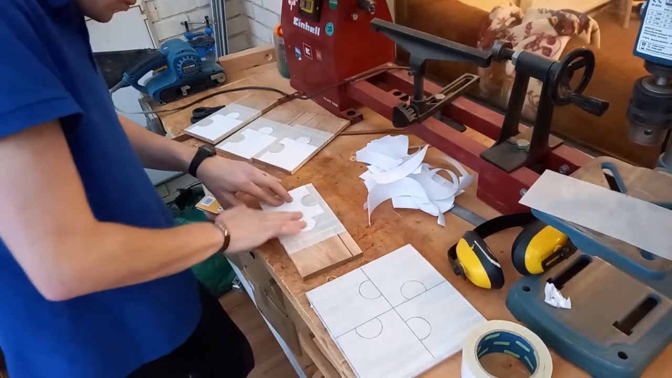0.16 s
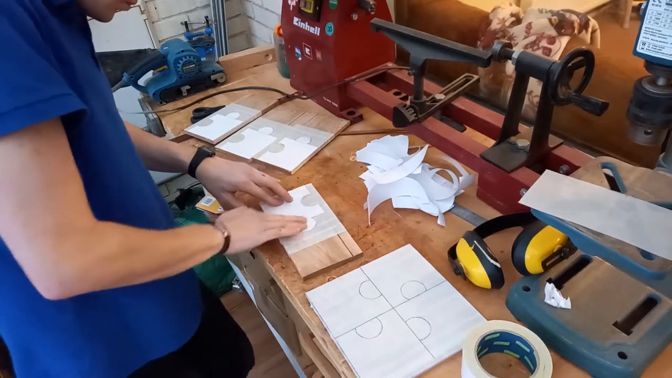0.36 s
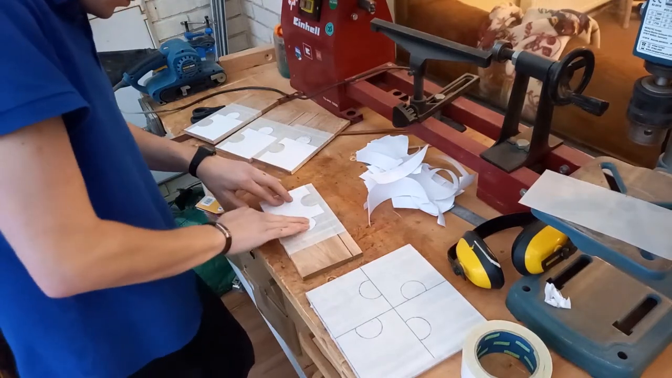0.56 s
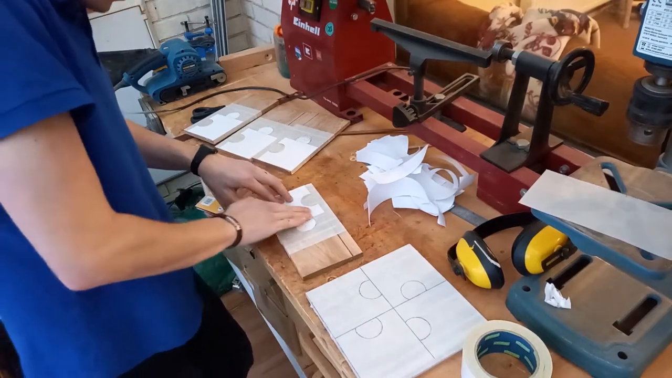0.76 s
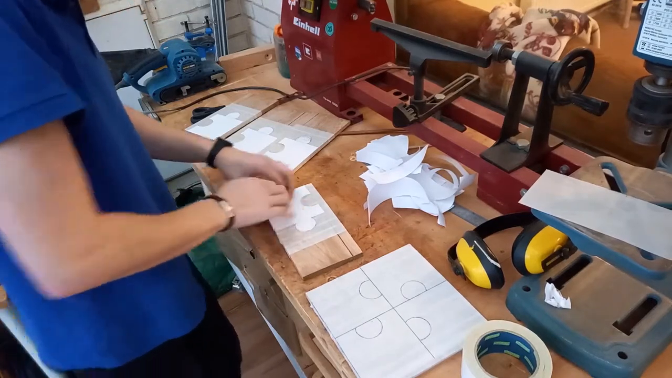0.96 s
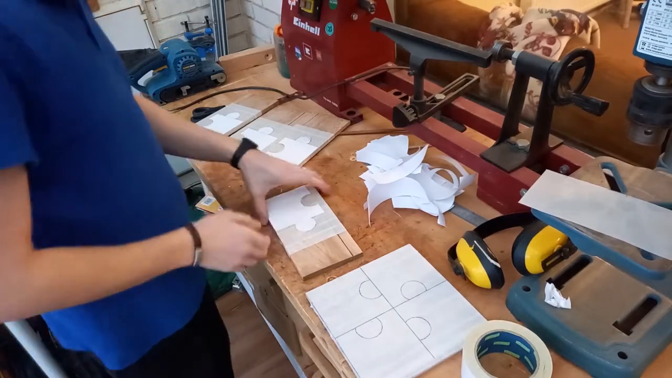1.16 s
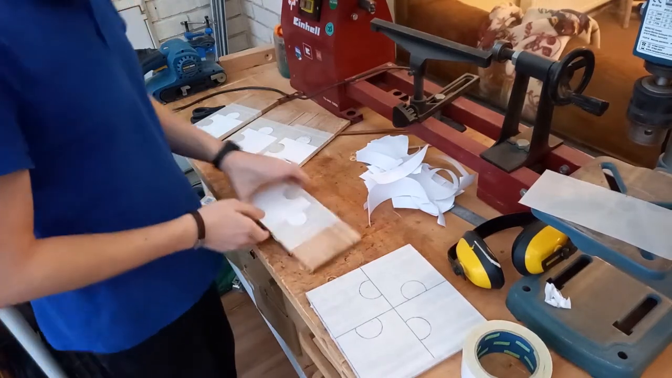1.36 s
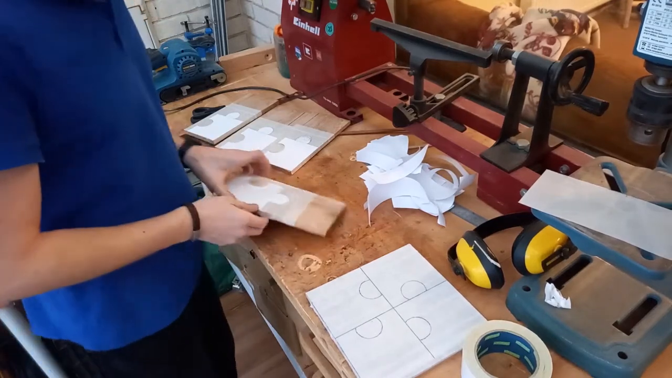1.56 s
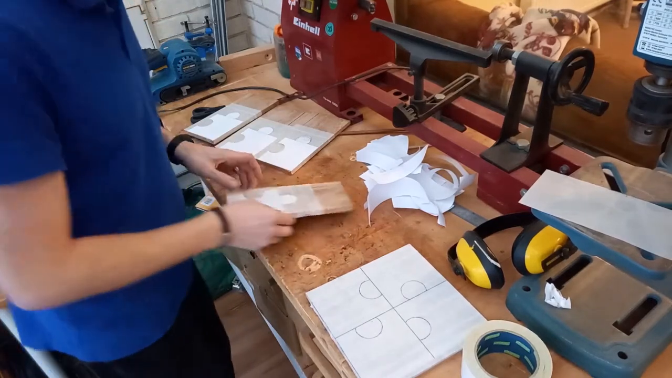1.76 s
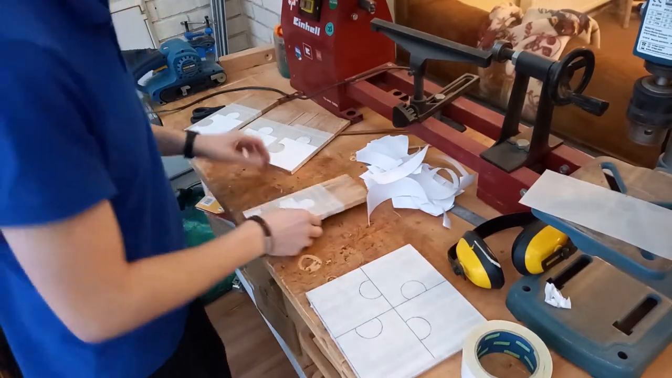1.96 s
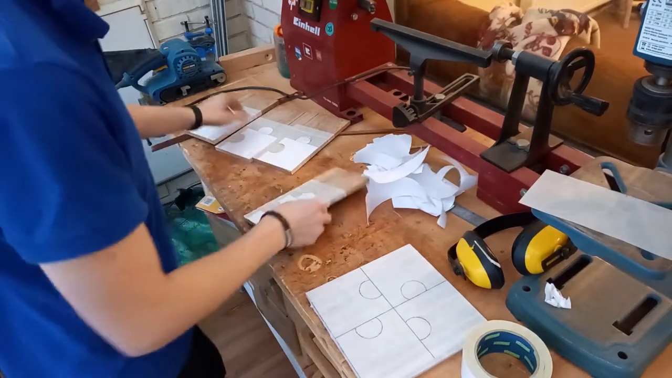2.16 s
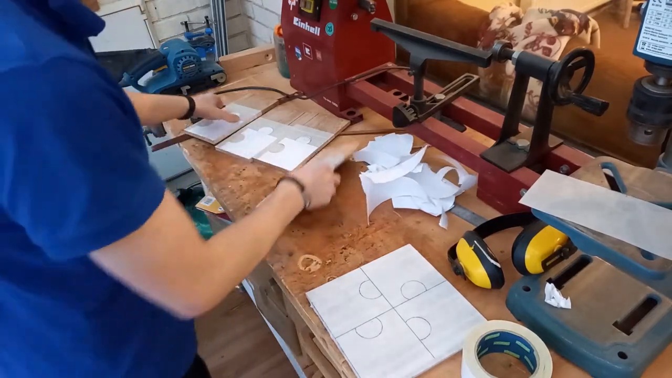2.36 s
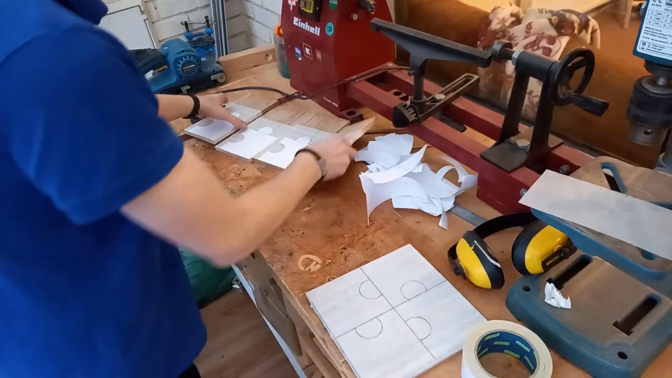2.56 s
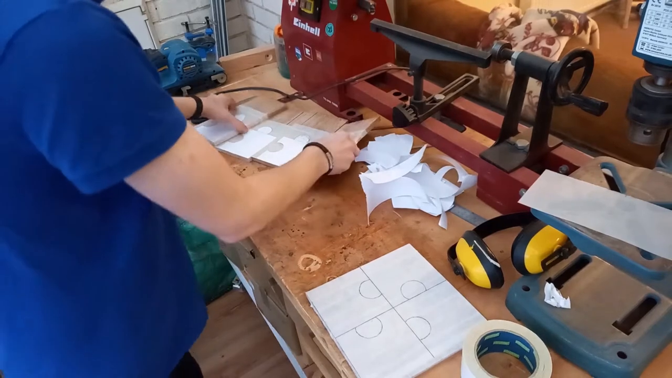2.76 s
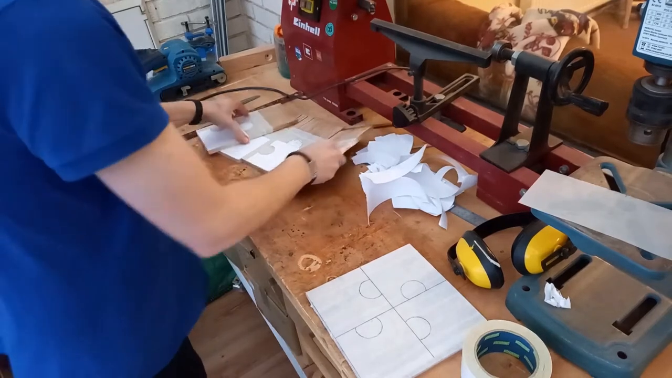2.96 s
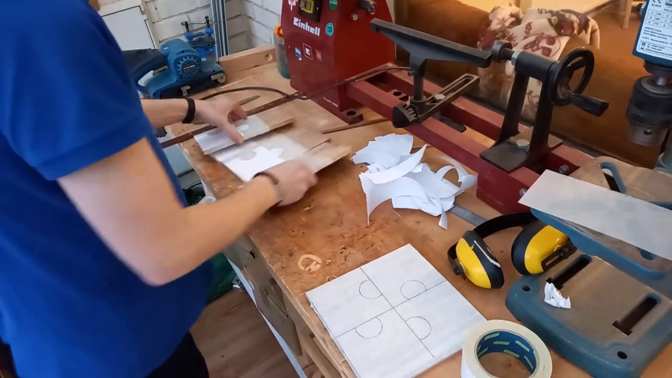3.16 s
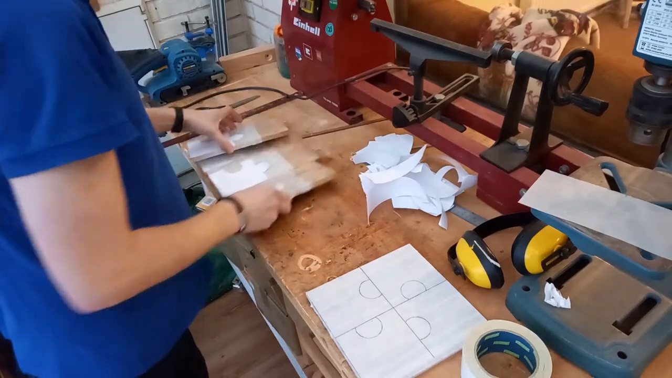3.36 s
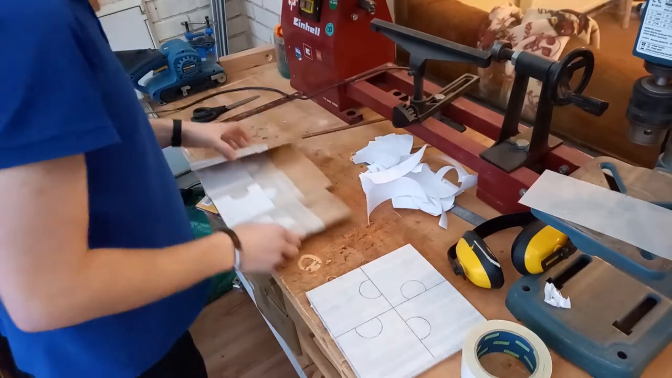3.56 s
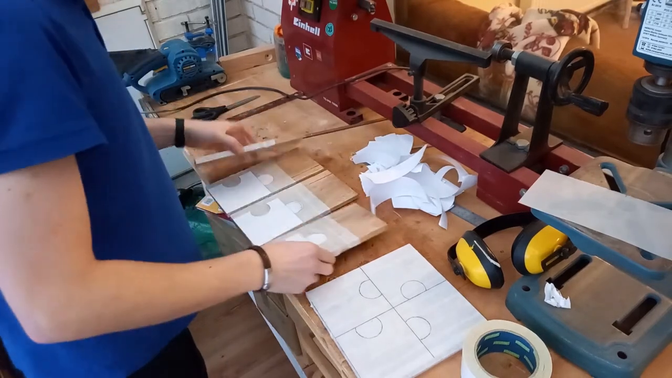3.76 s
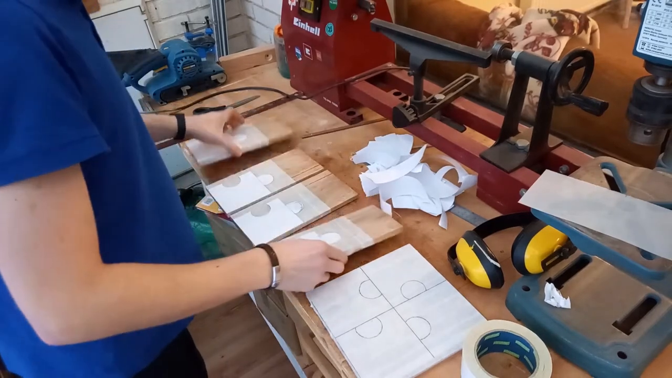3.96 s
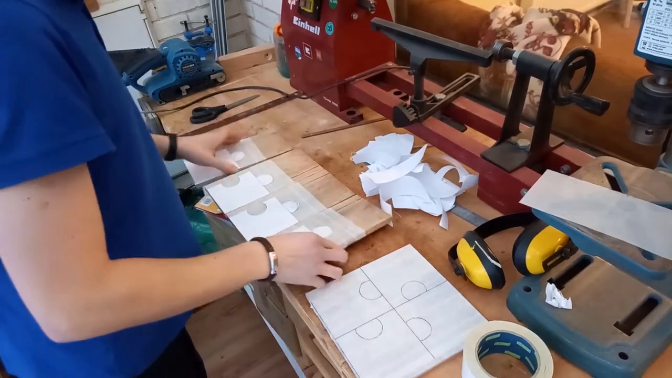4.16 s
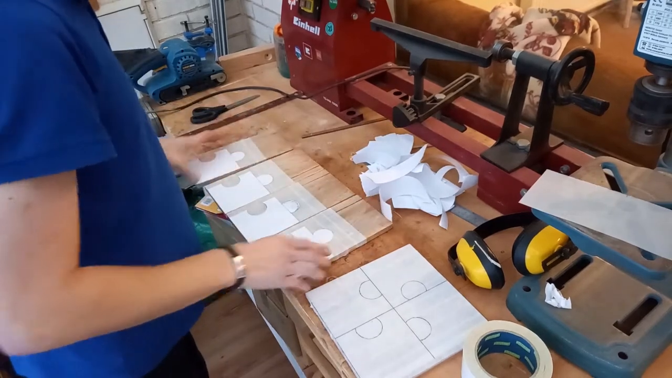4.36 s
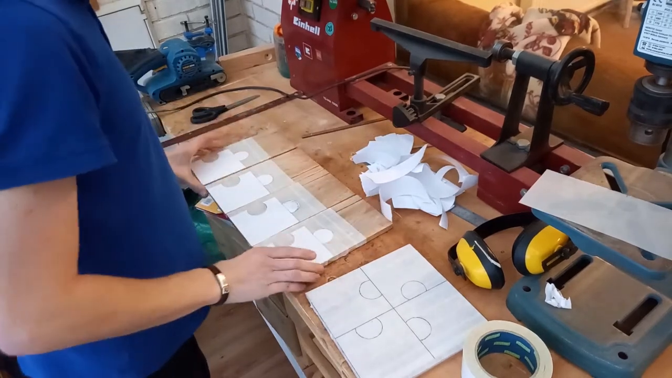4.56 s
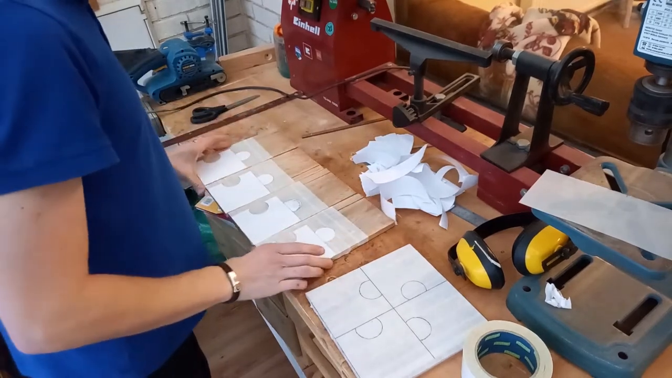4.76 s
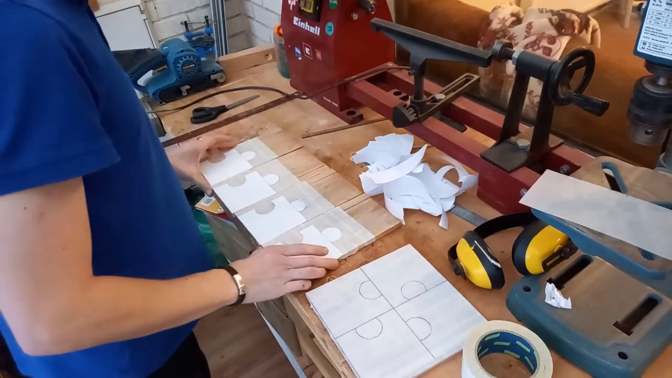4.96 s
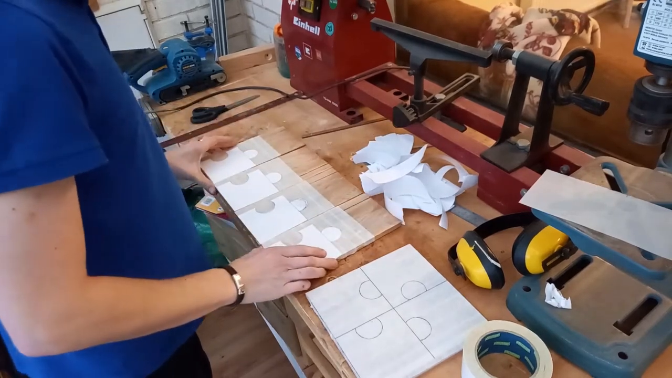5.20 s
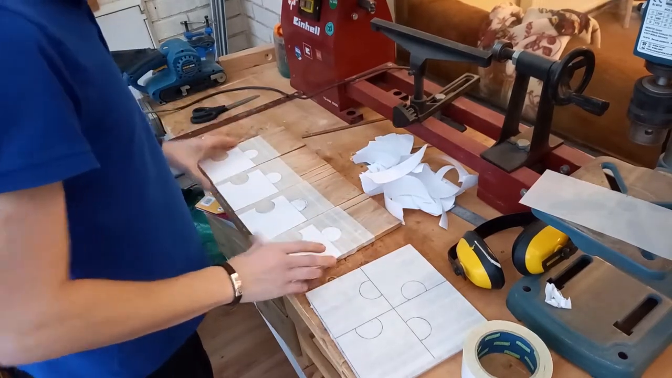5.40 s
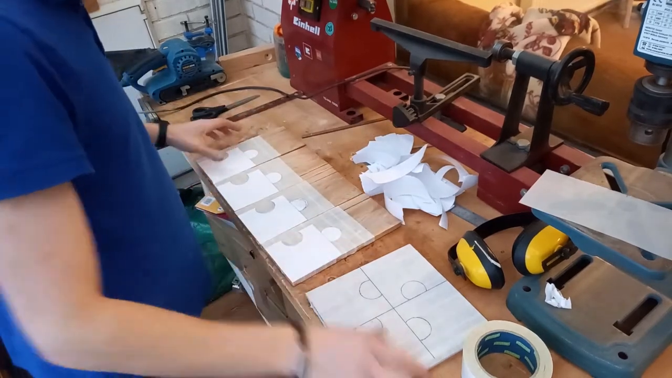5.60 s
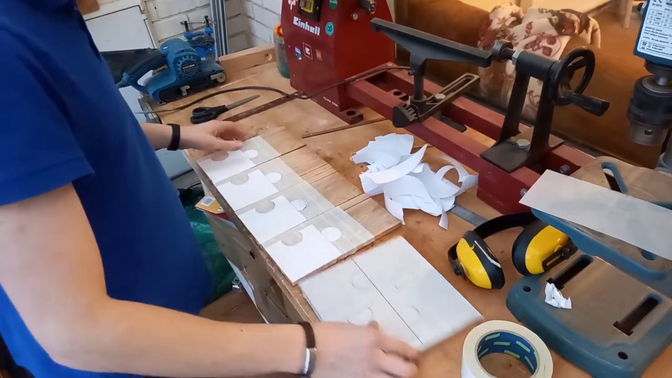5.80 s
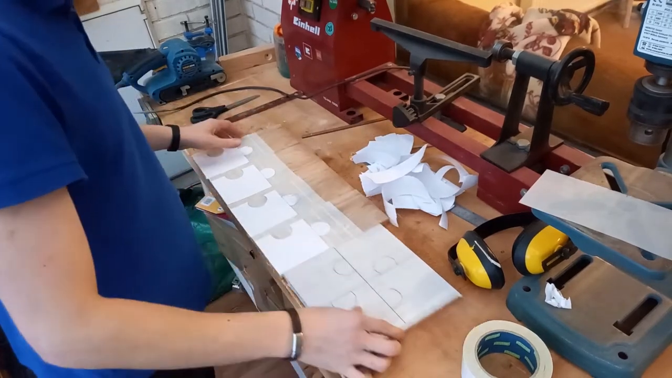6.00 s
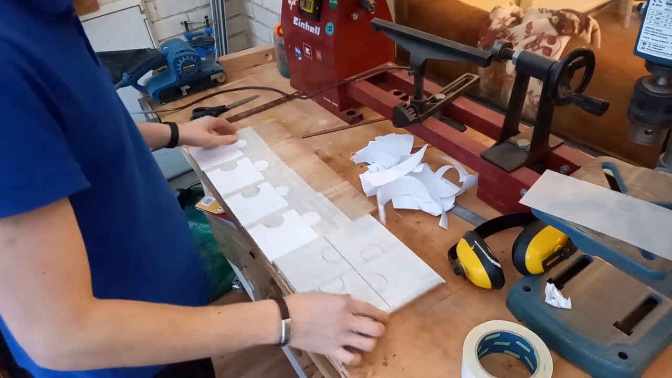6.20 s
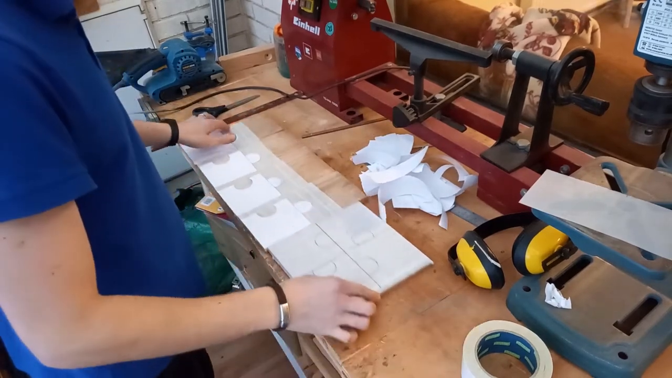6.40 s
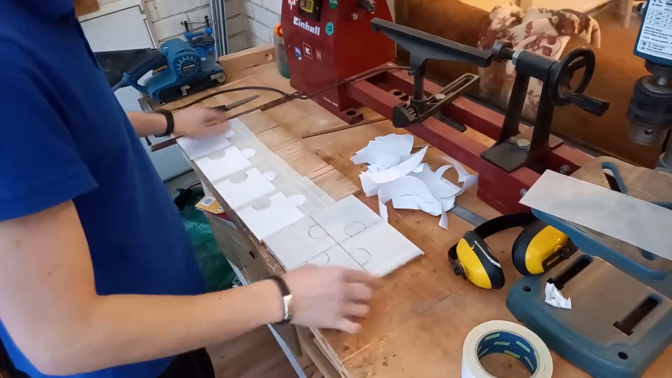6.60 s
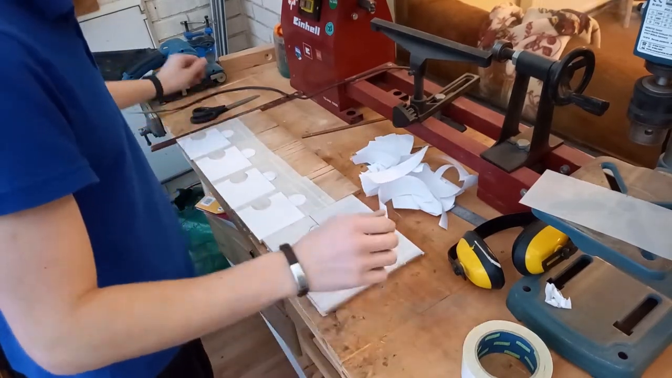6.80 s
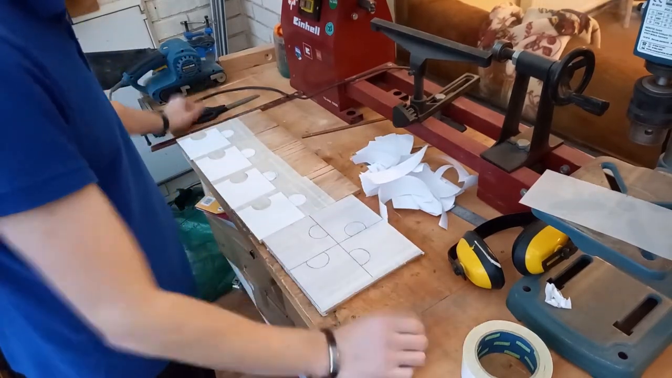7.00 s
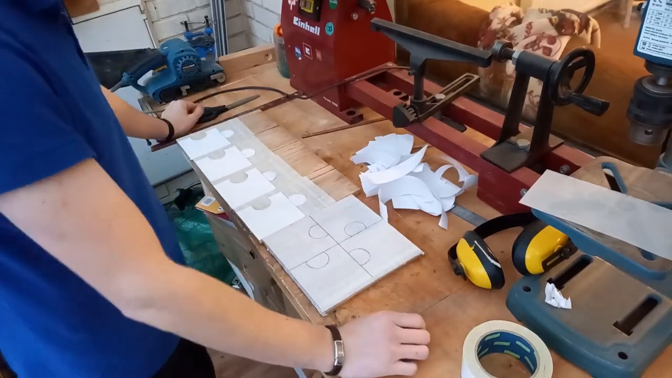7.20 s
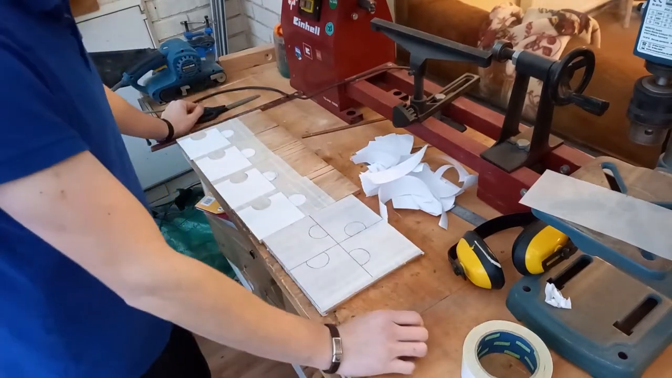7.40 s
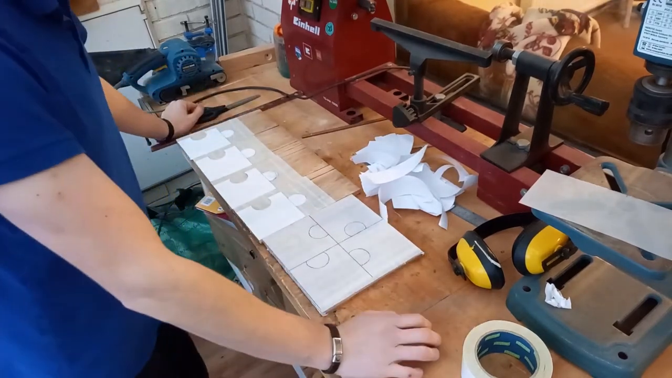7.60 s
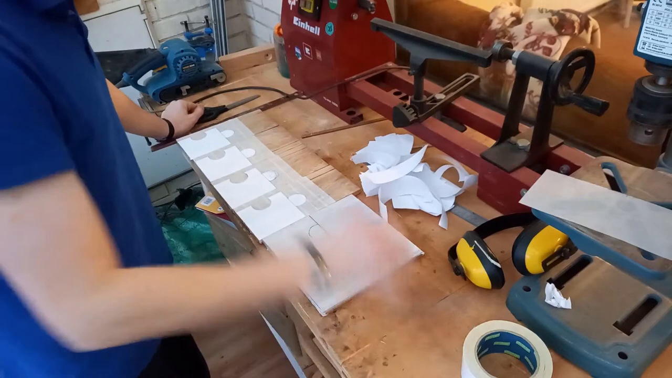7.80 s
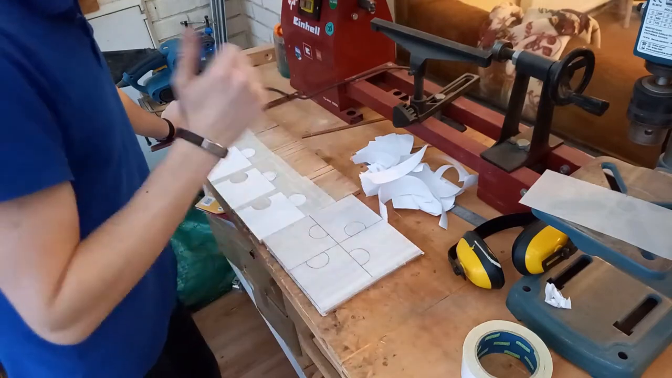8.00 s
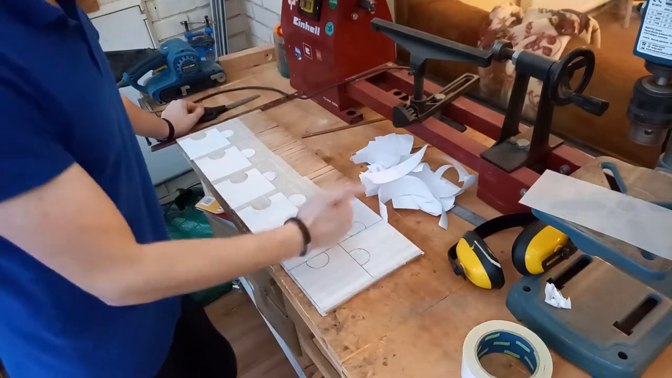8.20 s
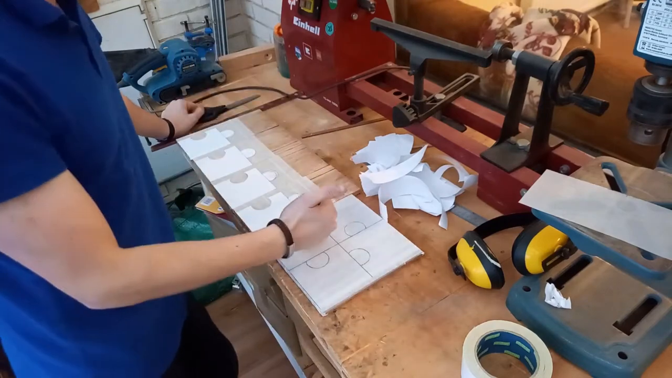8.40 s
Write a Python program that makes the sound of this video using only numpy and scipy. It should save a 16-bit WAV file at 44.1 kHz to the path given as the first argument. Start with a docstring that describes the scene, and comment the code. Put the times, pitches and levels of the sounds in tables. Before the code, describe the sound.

Fingers smooth paper on wood, then thin boards slide, knock and clack down on a workbench in a quiet room.

```python
"""A small workshop, a stereo pair of microphones close to a wooden workbench, faint air behind.
Thin wooden blanks with paper templates stuck on are being handled: fingers smooth the paper, one blank
is scraped off the bench, a stack is dragged closer and clacks down, the row is pushed along, and a hand
drops on the bench. Knocks and the friction of grain on grain ring bench, blank and paper together,
and the room answers with short reflections."""
import sys
import numpy as np
from scipy import signal
from scipy.fft import rfft, irfft, next_fast_len
from scipy.io import wavfile
from scipy.ndimage import uniform_filter1d

SR = 44100
rng = np.random.default_rng(int(sys.argv[2]) if len(sys.argv) > 2 else 0)


def file_out(sig):
    """Save sig as 16-bit WAV at sys.argv[1]."""
    # one column per channel
    cols = np.atleast_2d(sig).T
    # limit, then scale
    lim = np.clip(cols, -1, 1)
    pcm = np.round(lim * 32767).astype(np.int16)
    wavfile.write(sys.argv[1], SR, pcm)


N = 372644
RING_T = np.arange(SR // 3) / SR  # time axis of one ring-out, s


def gain_of(db):
    """Decibels to a factor."""
    return 10 ** (np.asarray(db) / 20)


def unit_rms(x):
    """Scales to rms 1."""
    return x / np.sqrt(np.mean(x ** 2) + 1e-30)


def unit_energy(x):
    """Scales to energy 1."""
    return x / (np.linalg.norm(x) + 1e-30)


def at_level(sound, db):
    """Sets the rms level of the first 25 ms."""
    return gain_of(db) * sound / np.sqrt(np.mean(sound[:SR // 40] ** 2) + 1e-30)


def read(points, hz):
    """Reads a table along a log-frequency axis."""
    f, value = np.transpose(points)
    return np.interp(np.log(hz + 1), np.log(f + 1), value)


def add(mix, s, sound):
    """Lays a sound into the mix at time s."""
    part = mix[max(round(s * SR), 0):][:len(sound)]
    part += sound[:len(part)]


def tinted(x, spectrum):
    """Colours a sound by a table of f/Hz, level/dB."""
    size = next_fast_len(x.shape[-1])
    gain = gain_of(read(spectrum, np.fft.rfftfreq(size, 1 / SR)))
    return irfft(rfft(x, size) * gain, size)[..., :x.shape[-1]]


def cut(x, hz, kind, order=3):
    """Low-, high- or band-pass."""
    return signal.sosfilt(signal.butter(order, np.clip(hz, 20, .49 * SR), kind, fs=SR, output="sos"), x)


def ringing(modes):
    """Response of separate modes to a click."""
    return unit_energy(sum((-1) ** k * gain_of(db - 60 * RING_T / t60) * np.sin(2 * np.pi * hz * RING_T)
                           for k, (hz, db, t60) in enumerate(modes)))


def damped(spectrum):
    """Response of crowded, quickly damped resonances to a click: a short coloured push."""
    log_gain = np.log(gain_of(read(spectrum, abs(np.fft.fftfreq(2 * len(RING_T), 1 / SR)))))
    minimum_phase = np.exp(np.conj(signal.hilbert(log_gain)))
    return unit_energy(np.fft.ifft(minimum_phase).real[:len(RING_T)])


def grains(count, per_s, spread_db):
    """Tiny collisions of surface roughness, of random size and sign."""
    size = gain_of(spread_db * np.minimum(rng.exponential(1, count), 5))
    return unit_rms(size * rng.standard_normal(count) * (rng.random(count) < per_s / SR))


# diffuse sound at the left and right microphones: f/Hz, correlation
MIC_LIKENESS = [(70, 1), (200, 0.81), (380, 0.86), (700, 0.65), (1300, -0.36), (4000, 0.28), (14000, 0.98)]
def diffuse_noise(count):
    """Stereo noise, as alike as the two microphones hear a diffuse field."""
    size = next_fast_len(count)
    a, b = rfft(rng.standard_normal((2, count)), size)
    same = np.clip(read(MIC_LIKENESS, np.fft.rfftfreq(size, 1 / SR)), -1, 1)
    mid, side = a * np.sqrt((1 + same) / 2), b * np.sqrt((1 - same) / 2)
    return irfft(np.array([mid + side, mid - side]), size)[:, :count]


# still air all round the microphones: f/Hz, relative level/dB
AIR_SPECTRUM = [(18, -45), (30, -13.5), (48, -11.5), (69, -5), (97, -13.5), (152, -12.5), (292, -14.5),
                (830, -17), (1140, -18.5), (2360, -22), (3320, -12.5), (4400, -23), (15500, -34.5)]
# its slow drift: t/s, level/dB
AIR_LEVEL = [(0, -68.5), (1.1, -69), (4.4, -77), (5.3, -80), (6.9, -72.5), (8.0, -71)]
def air():
    """Room tone: the faint hiss and hum of the workshop."""
    level_db = np.interp(np.arange(N) / SR, *np.transpose(AIR_LEVEL))
    return unit_rms(tinted(diffuse_noise(N), AIR_SPECTRUM)) * gain_of(level_db)


# modes of the bench top and of a blank held in the air: f/Hz, relative level/dB, t60/s
BENCH_MODES = [(168.27, 2, 0.14), (201.4, -4, .11), (227.6, 1.5, 0.13), (264.5, 0, .16), (322.2, -7.5, .11),
               (358.6, 3.5, .08), (410.06, -8.5, 0.18), (458.7, -6.5, 0.11)]
HELD_MODES = [(615, -8, .035), (797, 1, .085), (950, -2, .04), (1075, -3, .035), (1310, -9, .025),
              (2115, 0, .04), (2300, -3, .012), (2800, -4, .005), (3980, -4, .01), (6060, -14, .016)]
# crowded, quickly damped resonances of each part: f/Hz, relative level/dB
BENCH_BODY = [(25, -45.5), (60, -16.5), (115, -20.5), (160, -0.5), (260, -1.5), (400, -3.5), (520, -2.5),
              (700, -16.5), (1500, -76)]
BLANK_BODY = [(250, -37.5), (480, -2.5), (720, 2.5), (1180, -2), (1650, -6.5), (2000, -5), (2300, -7),
              (2900, -5.5), (4200, -11.5), (5500, -18.5), (9000, -57.5)]
PAPER_BODY = [(2000, -39.5), (4000, 3), (5300, 4), (6500, 2), (7600, 4), (8800, -2.5), (11500, 2),
              (13500, -2), (16000, -6.5)]
def responses():
    """How the bench, a lifted blank, a lying blank and the paper each answer a click."""
    bench = ringing(BENCH_MODES) + gain_of(-6.5) * damped(BENCH_BODY)
    return bench, ringing(HELD_MODES), damped(BLANK_BODY), damped(PAPER_BODY)


# fingers on the templates: t/s, length/s, drive of weight/dB, drive of hiss/dB
FINGER_RUBS = [ (0.0, 0.082, -62.5, -64), (0.065, 0.41, -69.5, -74), (0.4, 0.159, -61, -71.5),
               (0.59, 0.157, -67.5, -66), (0.715, 0.261, -102, -71), (0.894, 0.243, -63.5, -67),
               (1.059, 0.364, -55, -63), (1.83, 0.276, -50, -66), (2.156, 0.3005, -52.5, -58.5),
               (2.463, 0.352, -51.5, -68.5), (2.78, 0.1073, -30.5, -41.5), (3.102, 0.135, -36, -51),
               (4.419, 0.235, -53.5, -71), (4.688, 0.37, -48.5, -70.5), (5.364, 0.17, -63, -77.5),
               (5.59, 0.119, -52.5, -65), (6.625, 0.197, -62, -72.5), (7.319, 0.237, -67, -85.5),
               (7.533, 0.114, -58, -79), (7.676, 0.1154, -57, -70.5)]
def finger_rubs():
    """Fingers stroke the paper and lean on the wood: bench rumble, blank ring, edge rasp, paper hiss."""
    power = np.zeros((5, N))
    bench, _, blank, edge, paper = power
    for start, length, weight_db, hiss_db in FINGER_RUBS:
        arch = np.sin(np.linspace(0, np.pi, int(length * SR)))
        weight, hiss = gain_of(weight_db) * arch, gain_of(hiss_db) * arch
        add(bench, start, weight ** 2)
        add(blank, start, (weight * gain_of(-6)) ** 2)  # the blank takes up part of the weight
        add(edge, start, (weight * gain_of(-16.5) + hiss * gain_of(-2)) ** 2)
        add(paper, start, hiss ** 2)
    return power


def wandering(x, patchy_db):
    """The point of contact travels, so it favours ever different resonances."""
    spectra = signal.stft(x, nperseg=1024, noverlap=768)[2]
    patches = uniform_filter1d(rng.standard_normal(spectra.shape), size=5, axis=0)
    patches = unit_rms(uniform_filter1d(patches, size=9, axis=1))
    return signal.istft(spectra * gain_of(patchy_db * patches), nperseg=1024, noverlap=768)[1][:N]


def friction(power, lifted_power, bench, free, flat, paper):
    """Grain rubs over grain; the pressure catches and slips, and all parts answer together."""
    on_bench, on_drone, on_blank, on_edge, on_paper = np.sqrt(power)
    lift = np.clip(lifted_power / (on_blank ** 2 + 1e-30), 0, 1)
    slip_db = 0.62 * unit_rms(cut(rng.standard_normal(N), 58, "low", order=2))
    force = wandering(grains(N, per_s=9000, spread_db=4.0), patchy_db=1.5) * gain_of(slip_db)
    shudder = ringing([(358, 0, 0.18)])  # a dragged blank shudders with one resonance of the bench top
    rumble, drone, held, lying, hiss = (unit_rms(signal.oaconvolve(force, part)[:N])
                                        for part in (bench, shudder, free, flat, paper))

    def wood(kind, freedom):
        """The low or high modes of the blank, between damped and freely ringing."""
        rings, dead = (unit_rms(cut(x, 1575, kind, order=4)) for x in (held, lying))
        return np.sqrt(freedom) * rings + np.sqrt(1 - freedom) * dead

    ring = wood("low", lift)
    rasp = wood("high", 0.7 * np.sqrt(lift))  # the grip damps the rest of the upper modes
    rumble = unit_rms(cut(rumble, 85, "high", order=2))  # rubbing is too light to rock the frame
    return (rumble * on_bench * gain_of(-1.88) + drone * on_drone + ring * on_blank * gain_of(0.5)
            + rasp * on_edge * gain_of(3.5) + hiss * on_paper * gain_of(6.0))


def contact(chatter_s):
    """Force of one touch: a click, then surfaces chattering as they settle."""
    u = RING_T / max(chatter_s, 1 / SR)
    force = 0.06 * u * np.exp(1 - u) * grains(len(u), per_s=14000, spread_db=6.5)
    force[0] += 1 / (1 + (chatter_s / 0.013) ** 2)  # slow, fleshy touches have hardly any click
    return force


def scattered(force, chatter_s, t60, share):
    """A blow bounces about inside the material, differently at each place that is struck."""
    build_up = 1 - np.exp(-RING_T / max(chatter_s, 1 / SR))
    echoes = rng.standard_normal(len(RING_T)) * build_up * gain_of(-60 * RING_T / t60)
    return unit_energy(force) + share * unit_energy(echoes)


# modes of a blank landing flat on the bench: f/Hz, relative level/dB, t60/s
LANDED_MODES = [(590, -5, .06), (718, -3, .05), (829, 1, .06), (968, 1, .06), (1660, -4, .03),
                (1855, 2, .03), (2142, 1, .035), (2340, -3, .02), (3950, -1, .014), (5165, 4, .016)]
# crowded, quickly damped resonances of a struck blank: f/Hz, relative level/dB
CLACK_BODY = [(250, -27.5), (480, -4), (700, 2), (950, 2.5), (1300, -3.5), (1850, -3.5), (2250, -3),
              (2900, -7), (4200, -11.5), (5300, -11), (9000, -45)]
# wood and hand knocking in front of the microphones, levels relative: t/s, bench/dB, blank/dB, paper/dB,
# hardness/Hz, chatter/s, rebound gap/s (0 = lands dead), lift (0 = lying flat, 1 = held in the air)
KNOCKS = [ (.1, -64.5, -59.5, -64.5, 7250, 0.000365, 0.0139, 0.06),
          (.437, -62, -72.5, -72.5, 1534, 0.004, 0.00065, .1),
          (.617, -56.5, -60.5, -79.5, 1500, 0.00185, 0.037, 0.082),
          (1.153, -50, -73.5, -63.5, 1200, 0.00634, 0.0014, .1),
          (1.337, -60, -46.5, -51.5, 5000, 0.01, 0.0002, 0.35), (1.585, -66, -46, -53, 3970, .0004, 0, .4),
          (1.9747, -38.5, -29, -64, 1285, 0.00073, 0.0017, 0.082),
          (2.052, -43.5, -37, -65.5, 990, 0.00135, 0.0021, 0.24),
          (2.552, -44, -51.5, -59.5, 2950, 0.00061, .043, 0.147),
          (2.616, -38.5, -30, -32.5, 9490, 0.00177, 0.0091, 0.034),
          (2.667, -35.5, -32.5, -46, 3470, 0.00227, 0.0032, 0.047),
          (2.801, -24.5, -27, -41.5, 2650, 0.00125, 0.024, 0.0465),
          (3.338, -33, -32, -50.5, 1510, 0.00433, 0.003, 0.713),
          (3.492, -35, -51.5, -50.5, 2600, 0.002674, 0.00086, 0.41),
          (3.728, -27, -29.5, -53, 3700, 0.00132, 0.0016, 0.062),
          (3.914, -51.5, -42.5, -58.5, 1165, 0.0011, 0.00064, 0.52),
          (4.061, -32.5, -27, -44, 3030, 0.0014, .009, 0.085),
          (4.1195, -20.5, -20.5, -43.5, 2395, 0.00215, 0.014, 0.083),
          (4.235, -20, -17.5, -53.5, 2400, 0.0015, 0, .03),
          (4.818, -44.5, -61, -84, 1631, 0.000937, 0.0276, 0.049),
          (4.886, -49.5, -50, -67.5, 1178, 0.00207, 0.0007, 0.046),
          (5.632, -42.5, -44.5, -60.5, 6625, 0.00387, 0.0049, 0.044),
          (6.360, -38.5, -42, -64.5, 1392, 0.0133, 0, .05),
          (6.559, -33.5, -35.5, -54, 1698, 0.00083, 0, 0.043),
          (7.002, -40.5, -37.5, -49, 2960, 0.00825, 0.00066, 0.0213),
          (7.014, -29.5, -30.5, -41.5, 1498, 0.0048, 0.0179, 0.0198),
          (7.083, -31.5, -29, -40.5, 2800, 0.00131, 0.006, 0.01754),
          (7.174, -48, -64.5, -58.5, 889, .002, 0.0067, 0.026),
          (7.600, -42, -37, -58.5, 888.2, 0.00568, 0, 0.023),
          (7.611, -37.5, -40, -64, 795, 0.00197, 0, 0.004664),
          (7.668, -48, -50, -62.5, 850.8, .0008, 0.00012, 0.005),
          (7.745, -59, -57, -68.5, 1000, .002, 0, .02)]
def knocks(bench, free, paper, rebound_db=-6, rebound_hardness=0.976):
    """A blow thuds in the bench, clacks in the blank and slaps the paper; a lifted blank rings."""
    out = np.zeros(N)
    landed = unit_energy(damped(CLACK_BODY) + gain_of(-10.5) * ringing(LANDED_MODES))
    for s, bench_db, blank_db, paper_db, hard_hz, chatter_s, gap_s, lift in KNOCKS:
        blank = np.sqrt(1 - lift) * landed + np.sqrt(lift) * free
        for k in range(3 if gap_s > 0 else 1):  # the piece rocks, each rebound weaker and duller
            top_hz = hard_hz * rebound_hardness ** k
            force = contact(chatter_s)
            in_wood = scattered(force, chatter_s, t60=0.12, share=1.3)
            in_paper = scattered(force, chatter_s, t60=0.025, share=0.87)
            thud = signal.fftconvolve(force, bench)
            clack = signal.fftconvolve(in_wood, cut(blank, top_hz, "low"))
            slap = signal.fftconvolve(in_paper, cut(paper, 0.75 * top_hz, "low", order=2))
            for part, db in ((thud, bench_db), (clack, blank_db), (slap, paper_db)):
                add(out, s + k * gap_s, at_level(part, db + k * rebound_db))
    return out


# edges of paper and wood, heard close: t/s, relative level/dB, f/Hz, chatter/s
EDGE_TICKS = [(1.823, -45.5, 6200, 0.00042), (1.856, -40.5, 13400, 0.0022), (1.857, -43.5, 4300, 0.0058),
              (2.285, -39, 4930, 0.0012), (2.615, -29.5, 13030, 0.0018), (3.169, -34.5, 13300, 0.009),
              (3.729, -28.5, 3656, .0007), (4.06, -30, 1450, 0.0009), (4.117, -35, 2120, 0.0012),
              (4.2336, -20, 1951, 0.0018), (4.2364, -28, 5070, 0.00073), (4.12, -58.5, 13100, 0.028),
              (4.231, -49, 12500, .0008), (0.101, -54, 3360, 0.0006), (5.631, -39, 3088, 0.002637),
              (5.874, -38.5, 5620, 0.00061), (6.2, -43.5, 5760, 0.00047), (6.719, -50.5, 2335, 0.0109),
              (7.004, -47, 12200, 0.0196)]
def edge_ticks():
    """Short bright snaps where an edge catches."""
    out = np.zeros(N)
    for s, db, hz, chatter_s in EDGE_TICKS:
        snap = cut(contact(chatter_s), [hz / 1.41, hz * 1.104], "band", order=2)
        add(out, s, at_level(snap, db))
    return out


# fingertips on bare wood: t/s, length/s, first f/Hz, last f/Hz, level/dB
FINGER_JUDDERS = [(0.437, 0.041, 298.6, 287, -63), (0.62, 0.0324, 334, 259, -56),
                  (0.651, 0.0338, 293.6, 385.4, -56.5), (1.812, 0.0171, 388.3, 258, -29.5),
                  (1.835, 0.0307, 246.2, 352.7, -33.5), (2.255, 0.0466, 321.8, 241.3, -42.5),
                  (4.527, 0.0451, 356.5, 347.6, -53.5), (4.567, 0.053, 211.1, 239.2, -50),
                  (4.733, 0.0515, 399.6, 433, -53.5), (4.846, 0.0424, 378.1, 332.7, -43.5),
                  (4.885, 0.0233, 238.3, 209.6, -40.5), (5.08, 0.052, 361.1, 355.5, -56.5),
                  (7.172, 0.0176, 298.8, 260, -41.5)]
def finger_judders():
    """Skin sticks and slips on the wood for a few cycles: a short hollow grunt."""
    out = np.zeros(N)
    for s, length_s, first_hz, last_hz, db in FINGER_JUDDERS:
        u = np.linspace(0, 1, int(length_s * SR))
        waver = 1 + 0.1647 * unit_rms(uniform_filter1d(rng.standard_normal(len(u)), SR // 400))
        angle = 2 * np.pi * np.cumsum((first_hz + (last_hz - first_hz) * u) * waver) / SR
        grunt = np.sin(angle) + 0.37 * np.sin(2 * angle)
        add(out, s, gain_of(db) * unit_rms(grunt * np.sqrt(u) * (1 - u)))
    return out


# a dragged edge squeaking hoarsely on the bench: t/s, length/s, f/Hz, width/Hz, level/dB
EDGE_SQUEAKS = [(1.254, 0.065, 1870, 220, -50.5), (1.317, 0.0775, 3968, 280, -43),
                (1.332, 0.079, 5970, 130, -70.5), (1.407, .065, 4014, 350, -45.5),
                (3.287, 0.0714, 3346, 161.3, -40.5), (3.391, .22, 2230, 480, -33.5),
                (3.593, 0.0992, 2301, 380.1, -30.5), (4.479, 0.0195, 4900, 500, -60)]
def edge_squeaks():
    """Grain catches on an edge and keeps one resonance of the blank sounding for a moment."""
    out = np.zeros(N)
    for s, length_s, hz, width_hz, db in EDGE_SQUEAKS:
        arch = np.sin(np.linspace(0, np.pi, int(length_s * SR))).clip(0) ** 0.54
        band_hz = [hz - width_hz / 2, hz + width_hz / 2]
        voice = cut(rng.standard_normal(SR), band_hz, "band", order=2)[-len(arch):]
        add(out, s, gain_of(db) * unit_rms(voice * arch))
    return out


# blanks crossing the bench top: t/s, length/s, time to steady speed/s, starting speed/dB, then the drive
# of bench rumble/dB, bench drone/dB, blank ring/dB, edge rasp/dB, paper hiss/dB, and lift (0 to 1)
BLANK_SLIDES = [ (1.296, 0.0908, 0.058, -21.5, -37.5, -42, -38.5, -42.5, -57, 0.3263),
                (1.406, 0.0344, 0.017, -11, -44, -47, -35, -37, -55.5, 0.81),
                (1.59, 0.26, 0.17, -10, -53, -49.5, -44.5, -53, -65.5, 0.7),
                (2.07, 0.26, 0.055, -6, -44, -42, -43.5, -53, -61.5, 0.62),
                (2.657, 0.14, 0.12, -15.5, -32.5, -29, -32, -45, -46.5, 0.02),
                (2.894, 0.3137, .01, -18, -39.5, -42, -46.5, -48, -57.5, 0.038),
                (3.111, 0.463, 0.27, -13.5, -40.5, -35, -36.5, -39, -47.5, 0.0714),
                (3.461, 0.2355, 0.017, 4.5, -34, -30, -33, -39, -52.5, 0.31),
                (3.749, 0.062, .01, -2, -39, -40.5, -37.5, -55.5, -63, .4),
                (3.869, 0.116, .03, -4.5, -50.5, -50.5, -69.5, -64, -70.5, .5),
                (4.004, 0.074, .05, -7, -38, -47.5, -35.5, -46, -60, 0.5),
                (5.0, 0.146, .05, -5, -59.5, -58, -66.5, -69, -78.5, 0.0211),
                (5.65, 0.253, 0.011, -10, -48, -62.5, -48.5, -50, -59.5, 0.015),
                (5.744, 0.212, 0.1294, -13.5, -31, -36, -38, -48.5, -54.5, 0.00698),
                (5.964, 0.5967, 0.56, -1, -36, -35, -38.5, -46, -56, .02)]
def blank_slides(attack_s=0.0079, run_out_db_per_s=262):
    """A blank breaks loose, slides and runs out: power into each part, and into the lifted blank."""
    t = np.arange(N) / SR
    power, lifted_power = np.zeros((5, N)), np.zeros(N)
    for start, length, settle_s, start_db, *drive_db, lift in BLANK_SLIDES:
        age = t - start
        speed_db = start_db * np.clip(1 - age / settle_s, 0, 1) ** 2
        speed_db -= run_out_db_per_s * np.maximum(age - length, 0)
        speed = gain_of(speed_db) * np.clip(age / attack_s, 0, 1)
        stroke = np.outer(gain_of(drive_db), speed) ** 2
        power += stroke
        lifted_power += lift * stroke[2]  # row 2 is the blank's ring
    return power, lifted_power


# heavy blows rocking the whole bench: t/s, level/dB, rise/s
FRAME_THUMPS = [(2.798, -55, 0.0047), (4.119, -58, 0.004593), (4.235, -47, 0.0057), (7.01, -32.5, 0.0254),
                (7.604, -46, 0.01317)]
def frame_thumps():
    """The frame of the bench booms briefly under weight."""
    out = np.zeros(N)
    for s, db, rise_s in FRAME_THUMPS:
        boom = cut(contact(rise_s), [55, 160], "band", order=2)
        loudest_rms = np.sqrt(uniform_filter1d(boom ** 2, SR // 40).max())
        add(out, s, gain_of(db) * boom / loudest_rms)
    return out


# the bench top right beneath a landing blank: t/s, f/Hz, level/dB
TOP_BOOMS = [(4.2395, 226, -19.5)]
def top_booms(t60=0.15, swell_s=0.0031):
    """One low mode of the bench top swells and dies away under a flat landing."""
    out = np.zeros(N)
    swell = 1 - np.exp(-RING_T / swell_s)
    for s, hz, db in TOP_BOOMS:
        add(out, s, at_level(ringing([(hz, 0, t60)]) * swell, db))
    return out


# fingernails on the paper, dry and centred between the microphones: t/s, level/dB, f/Hz
NAIL_CLICKS = [(4.470, -74, 6000), (4.830, -62, 4600), (4.914, -69, 4600), (5.125, -72, 3200)]
def nail_clicks(chatter_s=0.00036):
    """Tiny clicks that scatter briefly in the paper, too slight to stir the room."""
    out = np.zeros(N)
    for s, db, hz in NAIL_CLICKS:
        force = scattered(contact(chatter_s), chatter_s, t60=.03, share=1.3)
        add(out, s, at_level(cut(force, [hz / 2.3, hz * 1.84], "band", order=2), db))
    return out


# decay of the workshop: f/Hz, t60/s
ROOM_T60 = [(100, 0.45), (500, 0.31), (2000, 0.4005), (5000, 0.36), (14000, 0.37)]
# reverberation against direct sound at the microphones: f/Hz, level/dB
REVERB_LEVEL = [(60, 4.5), (200, -4), (400, 1.5), (800, 2.5), (2500, 2), (6000, -0.5), (13000, 5.5)]
def reflections(build_up_s=0.0022):
    """One set of dense reflections for both microphones, each band dying at its own speed."""
    hz, t, spectra = signal.stft(diffuse_noise(SR // 2), SR, nperseg=256)
    t60 = read(ROOM_T60, hz)[:, None]
    tail = signal.istft(spectra * gain_of(-60 * t / t60) / np.sqrt(t60), SR, nperseg=256)[1]
    tail *= 1 - np.exp(-np.arange(tail.shape[1]) / SR / build_up_s)
    return tinted(tail / np.linalg.norm(tail[0]), REVERB_LEVEL)


def room(x, sets=5, crossfade_s=0.07):
    """Direct sound reaches the left microphone first; the reflections change as arms and wood move."""
    # direct and reflected sound share the power
    direct = tinted(x, [(hz, -10 * np.log10(1 + gain_of(db) ** 2)) for hz, db in REVERB_LEVEL])
    out = np.array([direct, np.roll(direct, 3)])
    place = np.arange(N) / SR / crossfade_s
    for k in range(sets):
        away = abs((place - k + sets / 2) % sets - sets / 2)
        fade = np.cos(np.pi / 2 * np.minimum(away, 1))
        out += signal.oaconvolve((direct * fade)[None], reflections(), axes=1)[:, :N]
    return out


def scene():
    """Bench, blanks and paper, rubbed and knocked, as they reach the microphones."""
    bench, free, flat, paper = responses()
    blows = gain_of(1.5) * knocks(bench, free, paper) + gain_of(-2.5) * edge_ticks()
    blows += frame_thumps() + top_booms()
    slide_power, lifted_power = blank_slides()
    rubbing = friction(finger_rubs() + slide_power, lifted_power, bench, free, flat, paper)
    return room(rubbing + edge_squeaks() + finger_judders() + blows) + nail_clicks() + air()


def record(dry):
    """The microphones drop the bass below 42 Hz; the recorder's band ends near 16 kHz."""
    band_limit = signal.firwin(511, 15950, window=("kaiser", 9), fs=SR)
    return signal.oaconvolve(cut(dry, 42, "high", order=2), band_limit[None], "same")


dry = scene()
out = record(dry)
file_out(out)
```